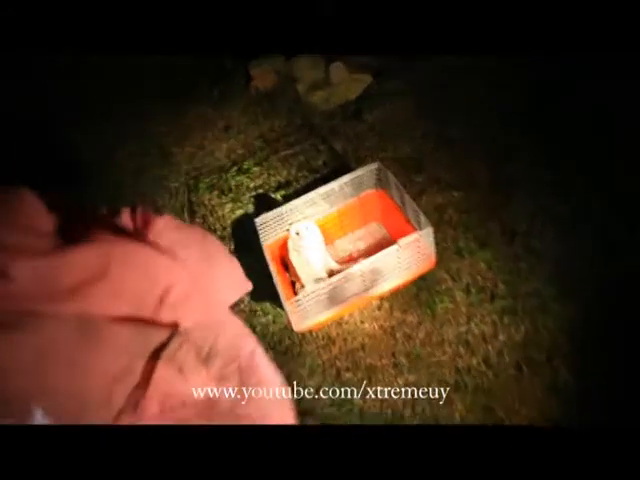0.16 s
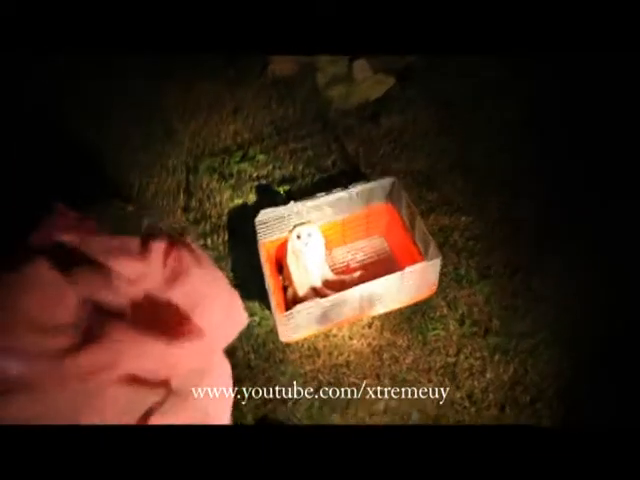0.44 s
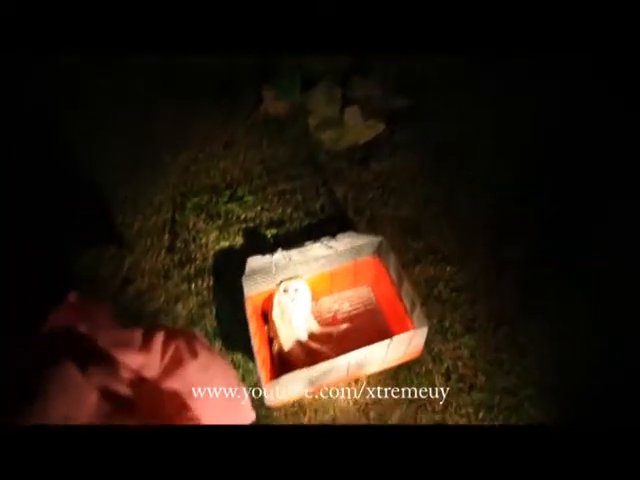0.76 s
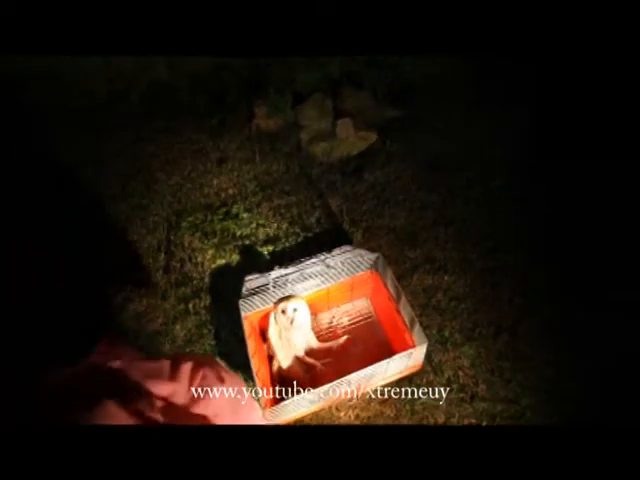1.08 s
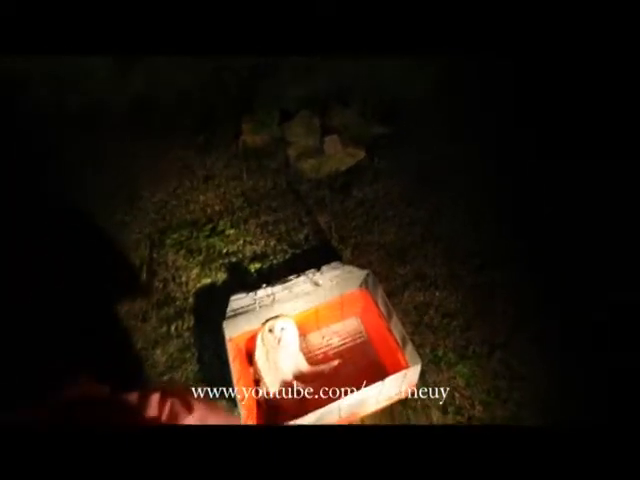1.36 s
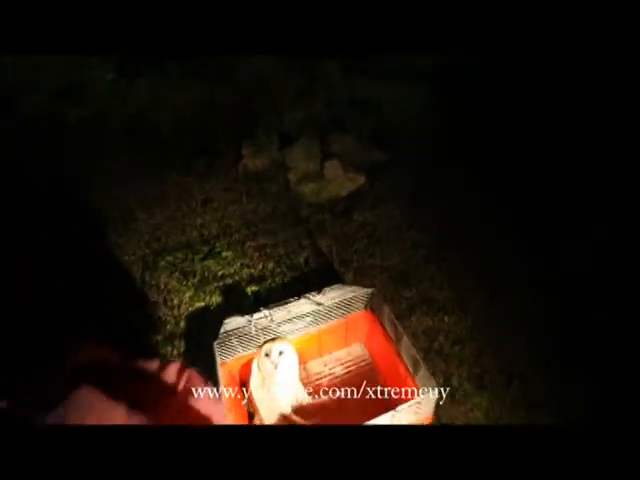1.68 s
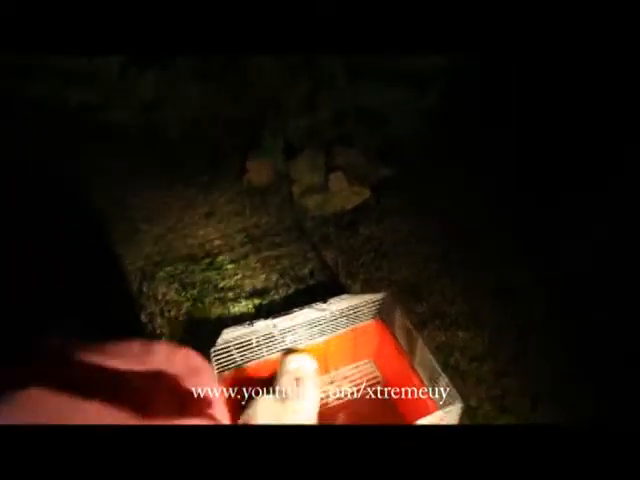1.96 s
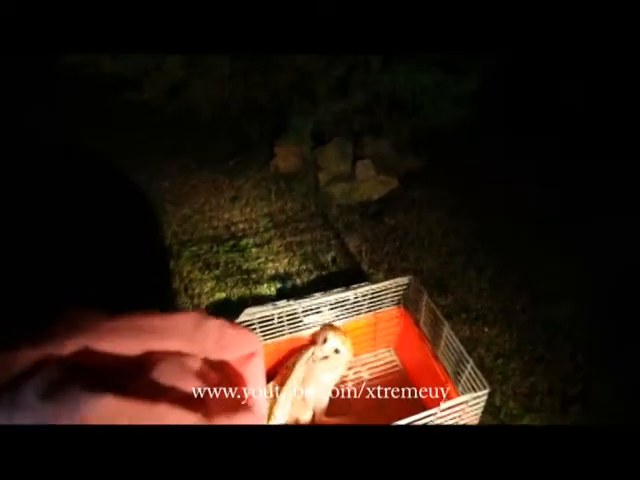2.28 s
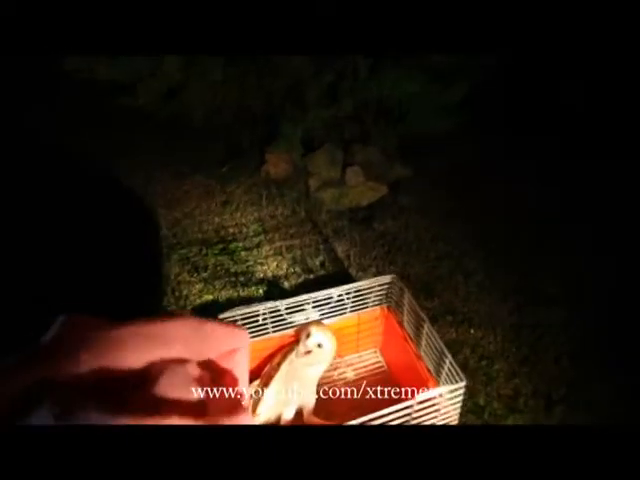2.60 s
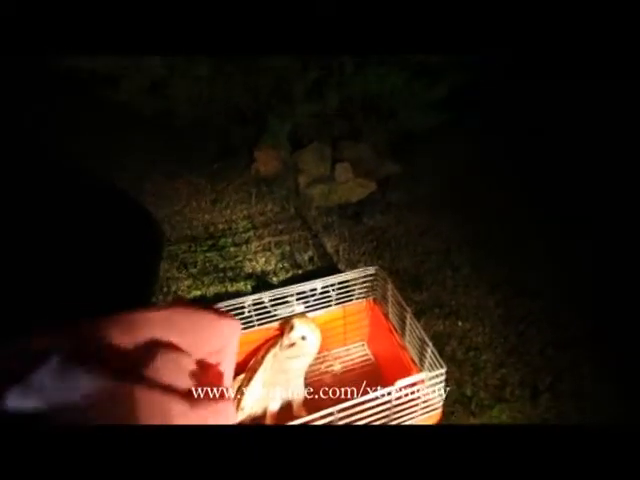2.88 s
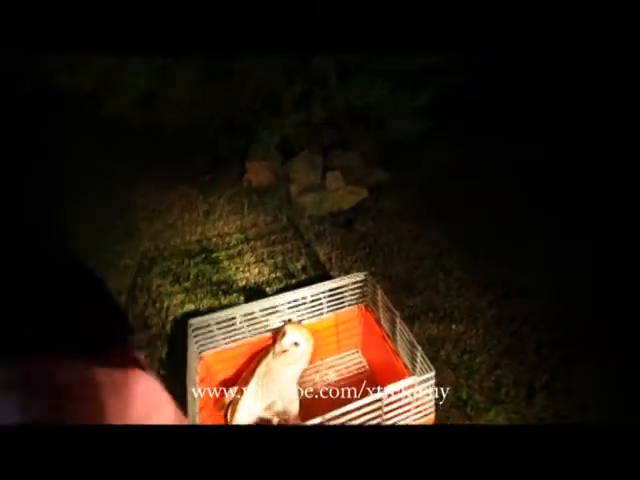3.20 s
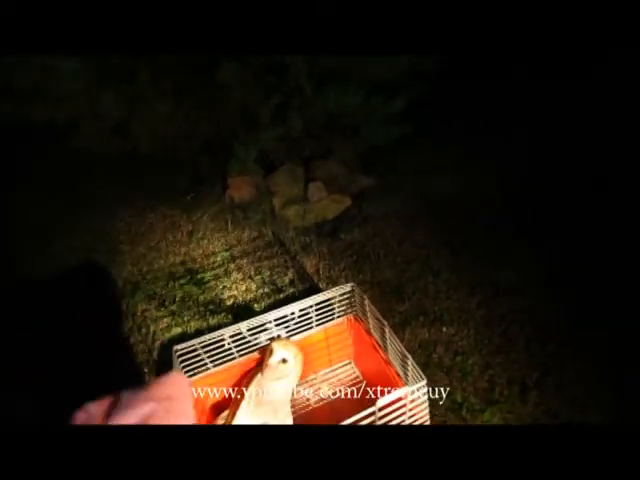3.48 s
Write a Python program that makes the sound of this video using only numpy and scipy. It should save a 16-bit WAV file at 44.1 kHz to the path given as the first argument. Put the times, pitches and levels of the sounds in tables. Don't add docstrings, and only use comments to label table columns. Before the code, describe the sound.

A barn owl in an open crate swells into one long harsh screech, wavers as it moves halfway through, then continues until an abrupt stop near the end; quiet night yard, hand-held microphone with soft bumps.

```python
import sys
import numpy as np
from scipy import signal
from scipy.fft import rfft, irfft
from scipy.io import wavfile
from scipy.ndimage import uniform_filter1d, map_coordinates

SR = 44100
rng = np.random.default_rng(int(sys.argv[2]) if len(sys.argv) > 2 else 0)


def output_pcm(signal):
    pcm = np.clip(np.atleast_2d(signal).T, -1, 1) * 32767
    wavfile.write(sys.argv[1], SR, np.round(pcm).astype(np.int16))


def linear_from_db(decibels):
    return 10 ** (np.asarray(decibels, float) / 20)


N = 160965


def evened(x):
    return x / np.sqrt(np.mean(abs(x) ** 2) + 1e-20)


def read(points, hz):
    f, value = np.transpose(points)
    return np.interp(np.log(hz + 1), np.log(f + 1), value)


def follow(points, t):
    return np.interp(t, *np.transpose(points))


def drift(top_hz, count=N):
    f = np.fft.rfftfreq(count, 1 / SR)
    gain = (f > 0) / (1 + (f / top_hz) ** 2)
    return evened(irfft(rfft(rng.standard_normal(count)) * gain, count))


def band(x, lo_hz, hi_hz):
    f = np.fft.rfftfreq(len(x), 1 / SR) + 1e-3
    loss = np.sqrt((1 + (lo_hz / f) ** 20) * (1 + (f / hi_hz) ** 20))
    return irfft(rfft(x) / loss, len(x))


# pitch_hz [Hz], level_db [dB per Hz]
HUSH_SPECTRUM = [(45, -13), (90, -15), (200, -18), (400, -14), (1000, -13), (2500, -20), (7500, -18.5),
                 (11500, -37)]
# start_s [s], level_db [dB]
RUSTLE = [(0, 8), (.7, -1.5), (2.0, 3), (2.15, 0), (3.6, -0.5)]


def hush():
    f, t = np.fft.rfftfreq(N, 1 / SR), np.arange(N) / SR
    noise = irfft(rfft(rng.standard_normal(N)) * linear_from_db(read(HUSH_SPECTRUM, f)), N)
    return linear_from_db(-55.5) * evened(noise) * linear_from_db(follow(RUSTLE, t))


# pitch_hz [Hz], level_db [dB]
MOTOR = [(96, -62.5), (190, -64), (285, -73.5)]


def motor():
    hum = np.zeros(N)
    for hz, db in MOTOR:
        level = linear_from_db(db + 2 * drift(2.3))
        pitch_hz = hz + 10 * drift(20.0)
        hum += level * np.sin(2 * np.pi * np.cumsum(pitch_hz) / SR)
    return hum


# start_s [s], level_db [dB]
WIND = [(0, -57.5), (.9, -48), (1., -61.5), (1.8, -53), (2.1, -78), (3.6, -75)]


def wind():
    t = np.arange(N) / SR
    gusts = linear_from_db(3.5 * drift(6))
    eddies = evened(band(drift(110), 36, 360) * gusts)
    return eddies * linear_from_db(follow(WIND, t))


# pitch_hz [Hz], width_hz [Hz], level_db [dB]
CLOSED = [(726, 415, 1), (2030, 150, 3), (6140, 300, 1), (8000, 1440, -11.5), (11500, 4000, -29)]
PARTING = [(1120, 3700, -25.5), (1900, 270, -10.5), (2225, 360, -10), (4430, 390, -37.5),
           (6740, 770, -14.5), (8460, 330, -19), (12000, 5300, -37.5)]
GAPING = [(1270, 4100, -21.5), (1885, 340, 2.5), (2410, 470, -1.5), (4030, 2300, -25.5),
          (6230, 1860, -20.5), (9000, 1100, -22.5), (10540, 1000, -24.5), (12370, 2600, -24.5)]
STRETCHED = [(1254, 2600, -24), (1872, 270, -4.5), (2440, 353, 1), (3740, 3200, -23), (5760, 580, -14.5),
             (6700, 860, -18), (10200, 1000, -23.5), (12000, 1700, -25)]
FACING = [(1260, 2000, -21.5), (1935, 270, 1), (2522, 385, 3.5), (3680, 1130, -17), (5755, 1560, -16.5),
          (6850, 650, -14), (9050, 870, -21.5), (10500, 670, -17.5), (12170, 2100, -24)]
TURNING = [(1750, 200, -28), (2536, 446, 2.5), (4450, 1500, -20), (5500, 1000, -17), (7020, 1030, -7),
           (8440, 1040, -16.5), (10000, 1500, -16), (14300, 1470, -30)]
LUNGING = [(1980, 210, -7), (2720, 350, -0.5), (3050, 550, -11), (4440, 1200, -17), (5840, 1900, -16),
           (7400, 900, -14), (8100, 500, -11.5), (10170, 2600, -22), (13500, 2500, -35)]
SWAYING = [(1960, 150, -17), (2390, 300, 2.5), (2910, 790, -10.5), (4300, 1140, -18), (5600, 660, -15),
           (6900, 1450, -6), (7900, 1000, -11), (10200, 1200, -26.5), (13500, 2500, -40)]
DUCKED = [(1024, 160, -21), (1890, 220, -19), (2364, 530, -5.5), (4190, 700, -22.5), (6700, 1540, -18.5),
          (8540, 980, -26), (12000, 1450, -53)]
BOWED = [(1020, 200, -17), (1830, 220, -8), (2250, 500, -6.5), (4180, 560, -20), (5830, 2000, -20),
         (6900, 1000, -28), (8370, 820, -32), (12500, 2500, -42)]
CHOKED = [(1090, 500, -24), (1880, 260, -3), (2610, 1100, -25), (3930, 580, -15), (6120, 1400, -14.5),
          (8000, 690, -27), (10800, 1400, -44)]
RISING = [(1070, 500, -24.5), (1990, 240, -3), (2260, 660, -2), (4060, 800, -17), (5780, 1100, -13.5),
          (6900, 1000, -11.5), (8450, 1020, -11.5), (12400, 2500, -38)]
CROUCHED = [(1160, 1100, -27.5), (1974, 140, -10.5), (2370, 496, -1), (3900, 3800, -21), (5530, 440, -16),
            (6900, 1330, -9.5), (8080, 990, -12.5), (9700, 1700, -26), (13200, 2600, -37)]
TIRING = [(1170, 820, -20.5), (1974, 296, -1.5), (2426, 360, 1.5), (3620, 2200, -17), (6050, 920, -12),
          (7000, 890, -14), (8160, 890, -11.5), (9700, 420, -19), (12020, 2600, -33)]
# start_s [s], end_s [s]
HELD = [(0, 0.064), (.115, 0.13), (.33, 0.71), (.93, 1.13), (1.24, 1.78), (1.83, 1.91), (1.935, 1.97),
        (1.99, 2.056), (2.062, 2.125), (2.15, 2.185), (2.2, 2.228), (2.238, 2.31), (2.3, 2.63), (2.98, 4.8)]
# pitch_hz [Hz], level_db [dB]
SPILL = [(300, -29), (1000, -39), (5000, -36), (15500, -49)]


def posture_db(hz, t):
    shapes = []
    for posture in (CLOSED, PARTING, GAPING, STRETCHED, FACING, TURNING, LUNGING,
                    SWAYING, DUCKED, BOWED, CHOKED, RISING, CROUCHED, TIRING):
        top = max(row[2] for row in posture)
        power = linear_from_db(read(SPILL, hz)) ** 2
        for f, width, db in posture:
            power = power + linear_from_db(db - top) ** 2 / (1 + (2 * (hz - f) / width) ** 2) ** 2
        shapes += 2 * [10 * np.log10(power / power.sum())]
    times = np.maximum.accumulate(np.ravel(HELD))
    return np.array([np.interp(t, times, row) for row in np.transpose(shapes)])


# start_s [s], pitch_ratio [1]
REACH = [(0, 1.04), (.1, 0.94), (.3, 1.003), (.45, 1.035), (.75, 1.01), (.95, 0.99), (1.1, .99), (1.3, .99),
         (1.55, 0.99), (1.72, 0.97), (1.82, 1.033), (1.9, 1.05), (2.1, 1.026), (2.3, 1.067), (2.6, 1.007),
         (3.0, 1.043), (3.3, 1.014)]


def stretched(shape_db, hz, t):
    ratio = 1 + (follow(REACH, t) - 1) / (1 + (hz[:, None] / 3500) ** 8)
    rows, columns = np.indices(shape_db.shape)
    return map_coordinates(shape_db, [rows / ratio, columns], order=1, mode="nearest")


# start_s [s], pitch_hz [Hz], level_db [dB]
BEAK_POCKET = [(0, 4700, 10), (.15, 5250, -36), (.3, 6220, -19), (.45, 6700, -10), (.75, 6900, -20),
               (.9, 7600, -25), (1.05, 8100, -8), (1.3, 8000, -9), (1.79, 8200, 0), (1.81, 8800, 0)]
ROOF_POCKET = [(.1, 10500, -11), (.5, 10200, -14), (.75, 10150, -14), (1.0, 9300, -14), (1.28, 10200, -31),
               (1.5, 9600, -7), (1.8, 10200, -15), (1.83, 9700, 2), (2.12, 9700, 4), (2.18, 10000, -14),
               (2.24, 11500, -10), (2.32, 12100, -16), (2.8, 12300, -19), (3.02, 12700, -12),
               (3.2, 12400, -16)]
TOP_GAP = [(.2, 14900, -3), (.33, 14800, -34), (.82, 14640, -32), (1.0, 13900, -16), (1.3, 14300, -26),
           (1.8, 14500, -25), (1.9, 15500, -19), (2.18, 14500, -22), (2.4, 14700, -5)]
CHEEK_POCKET = [(.15, 3700, -19), (.55, 3940, 6), (.75, 4300, -5), (1.2, 4300, -5), (1.75, 4700, -2),
                (2., 4800, -10), (3.3, 4990, -4)]
NOSTRIL_POCKET = [(.1, 7900, -5), (.25, 8100, -7), (.45, 7700, -6), (.55, 7500, -6), (2.3, 9300, 5),
                  (2.6, 9370, -7), (3.05, 9700, -7.5), (3.3, 9300, 1)]


def pockets_db(hz, t):
    out = 0
    for pocket, width_hz in ((BEAK_POCKET, 330), (ROOF_POCKET, 190), (TOP_GAP, 600),
                             (CHEEK_POCKET, 130), (NOSTRIL_POCKET, 150)):
        s, f, db = np.transpose(pocket)
        distance = (hz[:, None] - np.interp(t, s, f)) / width_hz
        out = out + np.interp(t, s, db) * np.exp(-distance ** 2)
    return out


def blotches(shape, tall, long):
    field = uniform_filter1d(rng.standard_normal(shape), size=tall, axis=0)
    return evened(uniform_filter1d(field, size=long, axis=1))


# pitch_hz [Hz], width_hz [Hz], level_db [dB]
BARS = [(1480, 50, 5.), (1580, 50, -5.), (3990, 40, -4.), (7350, 90, -3.)]


def crate_db(hz, t):
    shape = (len(hz), len(t))
    ripple = 2.2 * blotches(shape, tall=3, long=120) + 0.5 * blotches(shape, tall=12, long=24)
    shuffling = (t > 1.82) & (t < 2.29)
    treble = np.clip(hz[:, None] / 6000, 0, 1) ** 2
    jumps = 2.5 * shuffling * blotches(shape, tall=45, long=6) * treble
    fixed = -5.5 / (1 + (hz / 1823) ** 40)
    for f, width, db in BARS:
        fixed = fixed + db * np.exp(-((hz - f) / width) ** 2)
    fixed = fixed - 20 * np.log10(1 + (850 / (hz + 1)) ** 2)
    return ripple + jumps + fixed[:, None]


def throat_db(hz, t):
    out = stretched(posture_db(hz, t), hz, t)
    out = out + pockets_db(hz, t) + crate_db(hz, t)
    return out - 10 * np.log10((linear_from_db(out) ** 2).sum(0))


def flutter(x, lo_hz, hi_hz):
    free = band(x, lo_hz, hi_hz)
    stroke = abs(signal.hilbert(free)) + 1e-3
    held = band(free / np.sqrt(stroke), lo_hz, hi_hz)
    free_power = abs(uniform_filter1d(free ** 2, size=2000))
    held_power = abs(uniform_filter1d(held ** 2, size=2000))
    return held * np.sqrt(free_power / (held_power + 1e-9)) - free


# start_s [s], length_s [s], level_db [dB]
JERKS = [
    (1.836, .008, -5.),
    (1.919, 0.017, -2),
    (1.957, 0.031, -2.5),
    (2.035, .027, 1.5),
    (2.124, 0.098, 0.5),
    (2.282, 0.011, 2),
    (2.303, 0.026, 0.5),
    (2.373, 0.04, 1),
]


def beam_db(t):
    edge_s = 0.0046
    return sum(db * np.clip(np.minimum(t - s, s + length - t) / edge_s, 0, 1) for s, length, db in JERKS)


# start_s [s], level_db [dB]
EFFORT = [(0, -39), (.1, -26), (.3, -16.5), (.85, -15), (.94, -12), (1.03, -15), (1.75, -14), (1.85, -13.5),
          (1.92, -19), (1.945, -14.5), (1.975, -19), (2.05, -16), (2.08, -19.5), (2.16, -27.5),
          (2.3, -17.5), (2.7, -17), (3.0, -19.5), (3.15, -18)]


def owl():
    t = np.arange(N) / SR
    end_s, release_s = 3.405, 0.025
    air = rng.standard_normal(N) * linear_from_db(0.5 * drift(500))
    hz, frames, z = signal.stft(air, SR, nperseg=1024, noverlap=896)
    z = z * linear_from_db(throat_db(hz, frames))
    voice = evened(signal.istft(z, SR, nperseg=1024, noverlap=896)[1][:N])
    voice = voice + flutter(voice, 1600, 2150)
    voice = voice + flutter(voice, 2150, 3150)
    close = np.clip((end_s - t) / release_s, 0, 1)
    return voice * linear_from_db(beam_db(t) + follow(EFFORT, t) + 0.5 * drift(8.1)) * close


def yard(x):
    t = np.arange(SR) / SR
    t60_s, delay_s, centre_hz = 1, 0.0043, 5930
    tail = band(rng.standard_normal(SR), centre_hz / 2, centre_hz * 1.13)
    tail = tail * linear_from_db(-60 * t / t60_s) * (t > delay_s)
    return linear_from_db(-33.5) * signal.fftconvolve(x, tail / np.linalg.norm(tail))[:N]


# start_s [s], level_db [dB]
TICKS = [
    (.02, -38),
    (.61, -41),
    (1.988, -25.5),
    (2.285, -38),
]


def ticks():
    out, t = np.zeros(N + SR), np.arange(1500) / SR
    t60_s = 0.018
    for s, db in TICKS:
        at = round(s * SR)
        out[at:at + len(t)] += linear_from_db(db - 60 * t / t60_s) * rng.standard_normal(len(t))
    return band(out[:N], 250, 12000)


def thuds(table, mean_hz, cycles, snap_db, snap_hz):
    out, t = np.zeros(N + SR), np.arange(SR // 5) / SR
    for s, db in table:
        hz = mean_hz * (1 + 0.3 * rng.uniform(-0.74, 1))
        u = 2 * t * hz / cycles
        envelope = np.e * u * np.exp(-u)
        puff = evened(band(rng.standard_normal(len(t)), 130, snap_hz))
        push = np.sin(2 * np.pi * hz * t)
        at = round(s * SR)
        out[at:at + len(t)] += linear_from_db(db) * envelope * (push + linear_from_db(snap_db) * puff)
    return out[:N]


# start_s [s], level_db [dB]
BUMPS = [(0.219, -35), (0.248, -40), (0.349, -40.5), (0.48, -61), (0.609, -50), (0.747, -40), (0.858, -30),
         (1.25, -49), (1.329, -46), (1.669, -48), (1.777, -37.5), (1.989, -44), (3.439, -49)]


def bumps():
    return thuds(BUMPS, mean_hz=79.5, cycles=1, snap_db=-20.5, snap_hz=624)


# start_s [s], level_db [dB]
KNOCKS = [
    (1.8, -44),
    (2.0, -43),
    (2.95, -49),
    (2.98, -45),
]


def knocks():
    return thuds(KNOCKS, mean_hz=287, cycles=2.0, snap_db=-6, snap_hz=900)


def scene():
    bird = owl()
    mono = hush() + motor() + wind() + bird + yard(bird) + ticks() + bumps() + knocks()
    return np.array([mono, mono])


def roll_off(x):
    return signal.sosfilt(signal.butter(12, 15720, fs=SR, output="sos"), x)


def record(dry):
    low_pass = signal.firwin(1023, 15640, window=("kaiser", 9), fs=SR)
    mix = signal.oaconvolve(dry, low_pass[None], "same")
    return roll_off(mix)


dry = scene()
out = record(dry)
output_pcm(out)
```